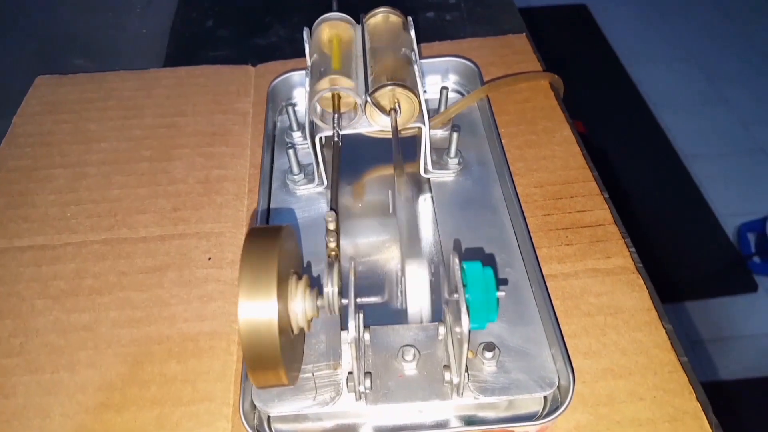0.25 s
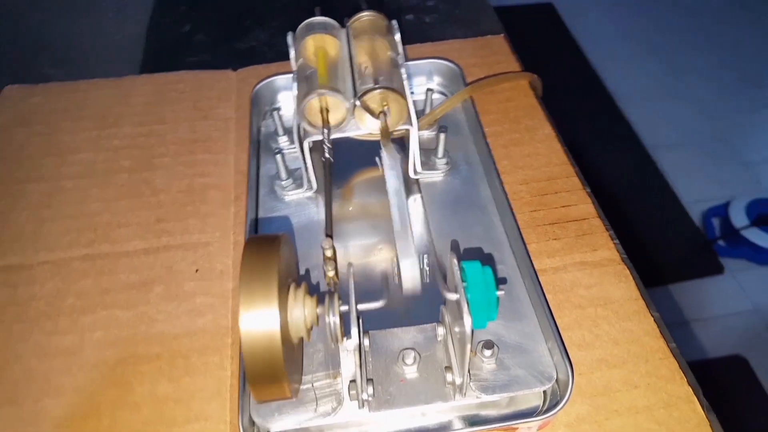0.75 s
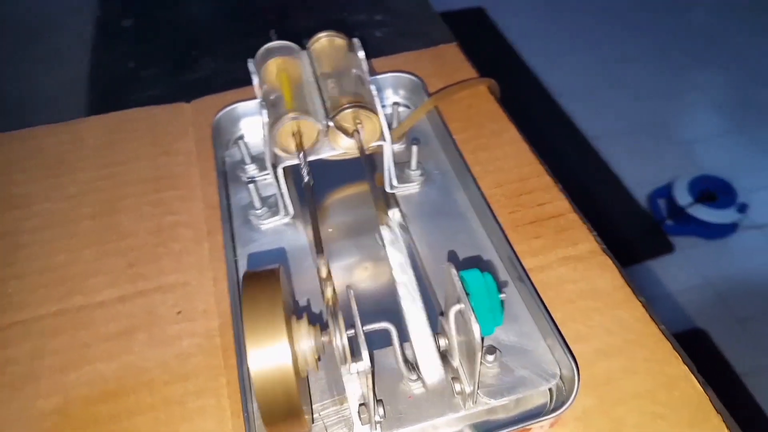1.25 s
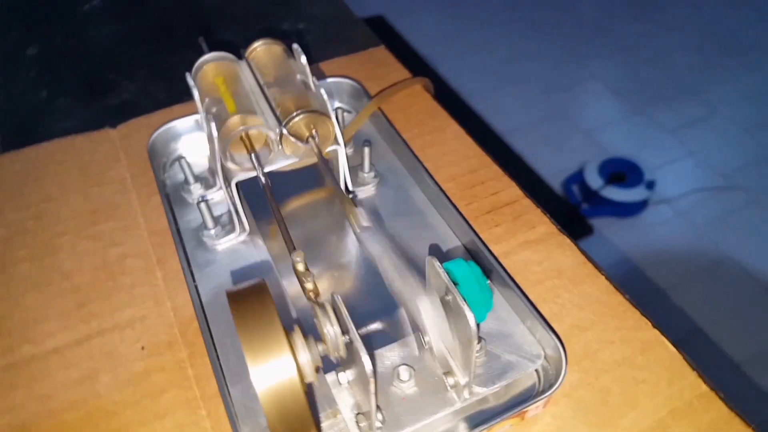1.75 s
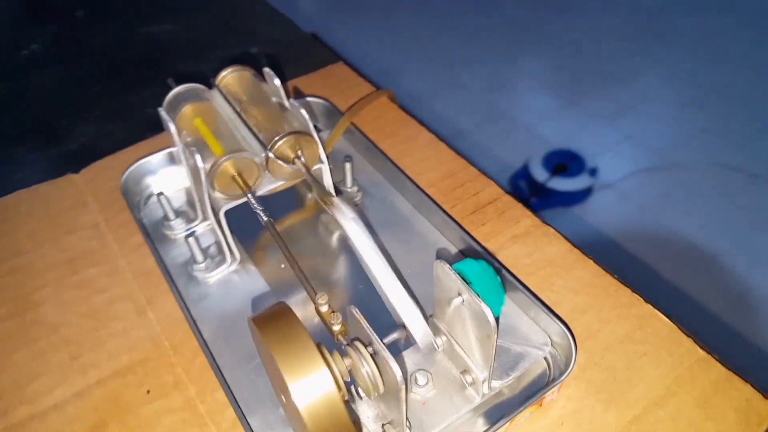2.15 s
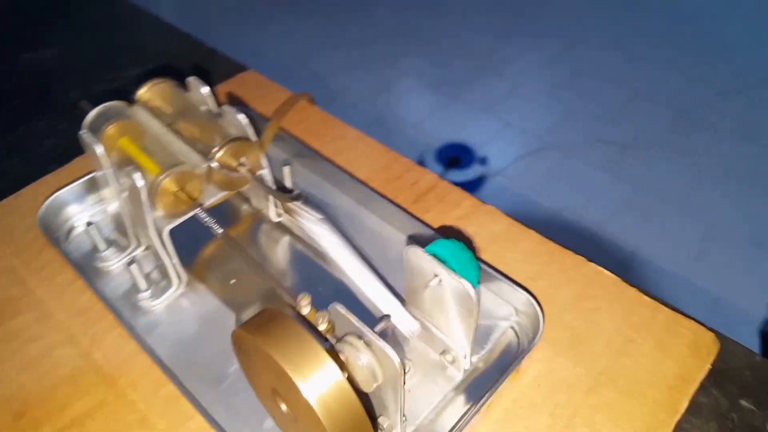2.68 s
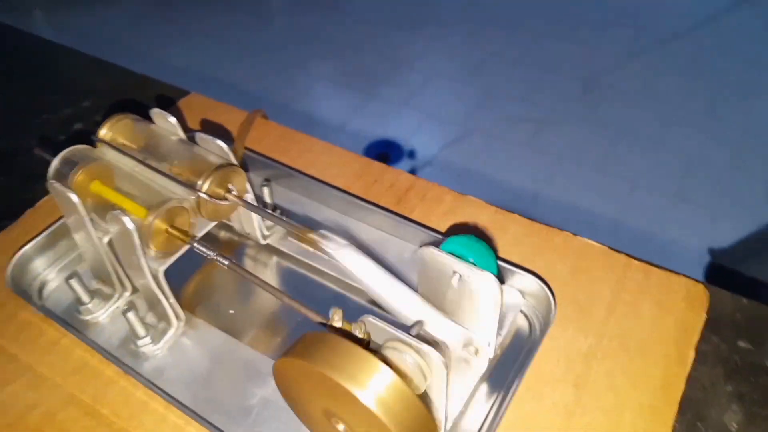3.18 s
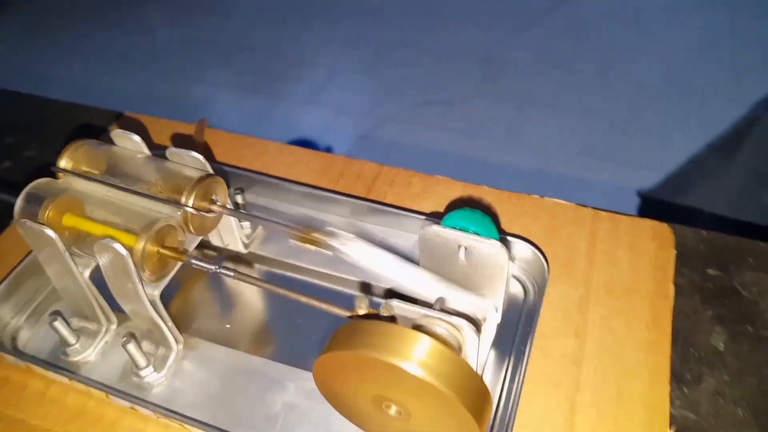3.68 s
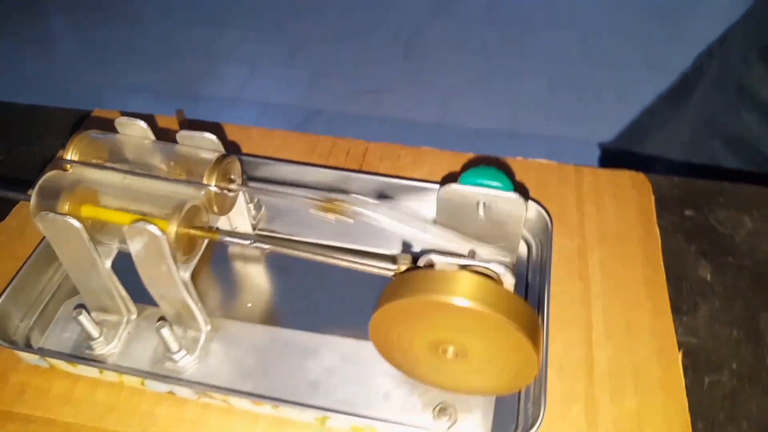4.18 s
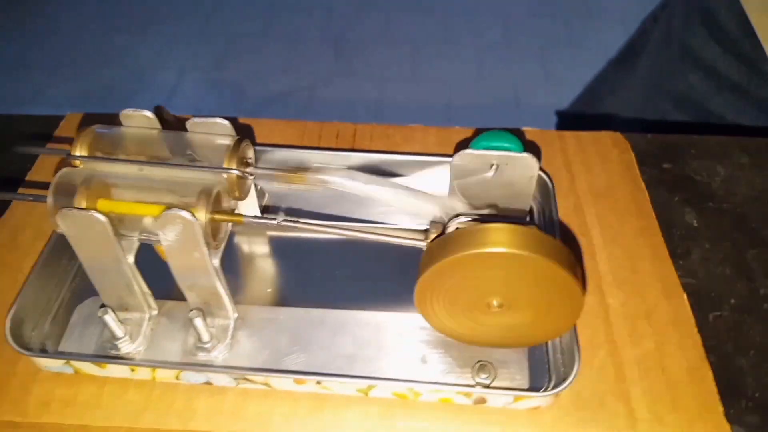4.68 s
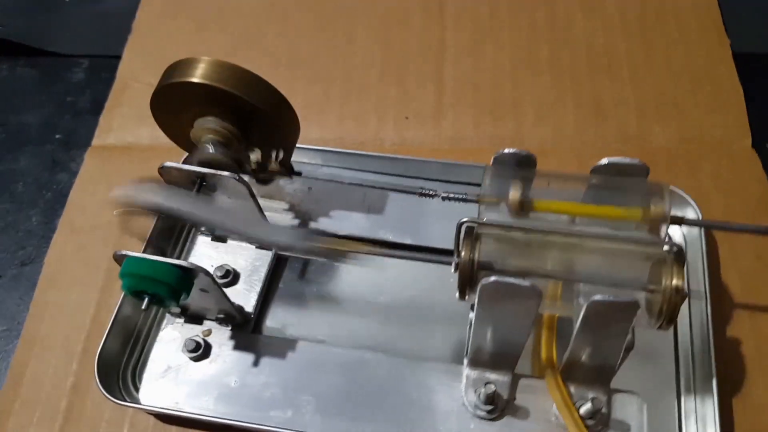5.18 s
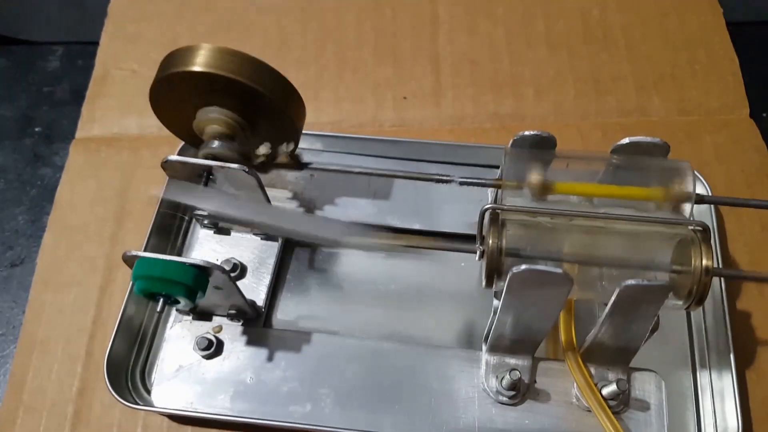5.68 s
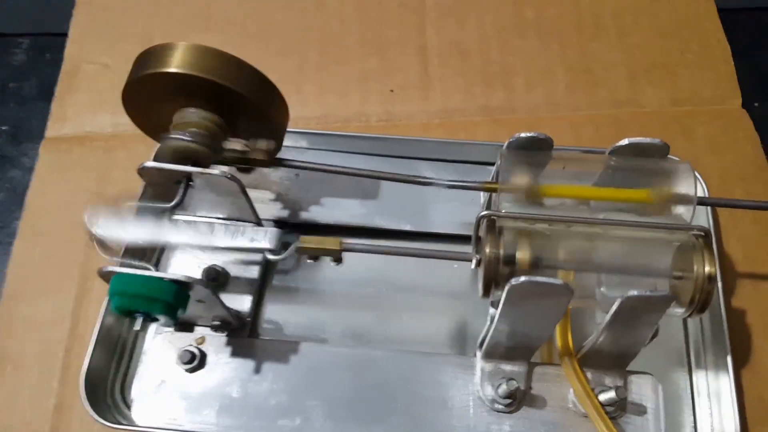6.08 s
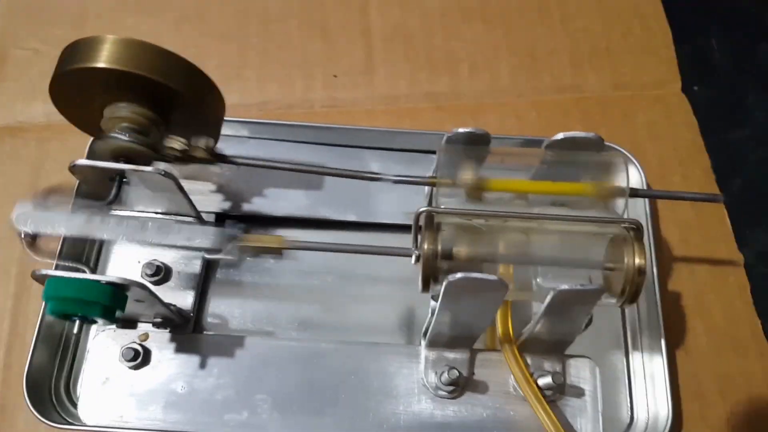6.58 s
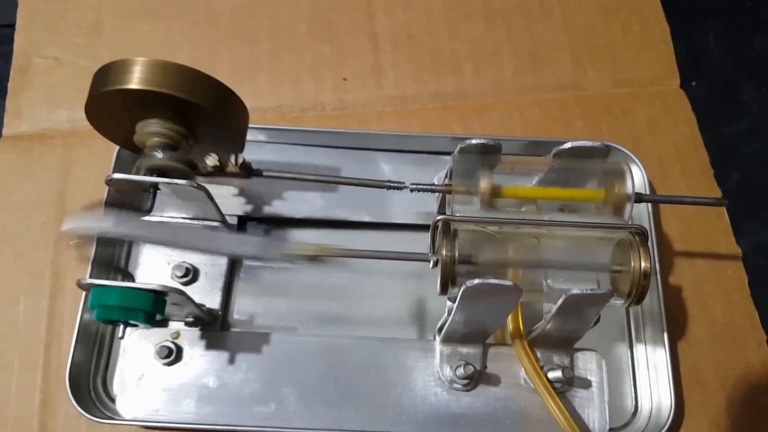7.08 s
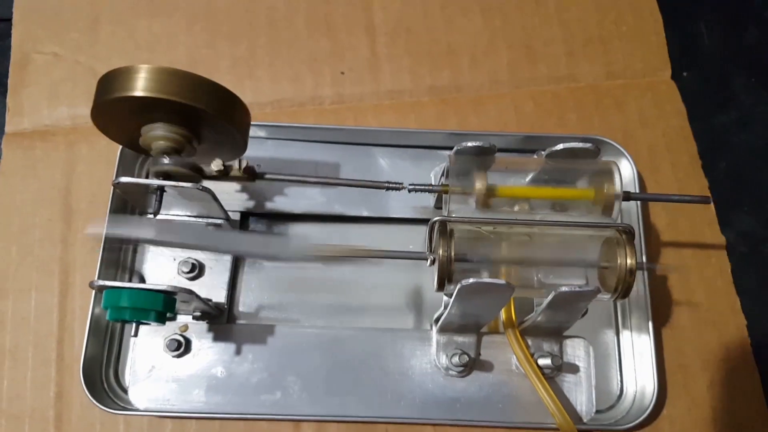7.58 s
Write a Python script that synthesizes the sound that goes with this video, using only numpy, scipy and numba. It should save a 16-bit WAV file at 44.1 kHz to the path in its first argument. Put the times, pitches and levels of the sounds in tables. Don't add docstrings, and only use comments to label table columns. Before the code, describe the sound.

Close handheld stereo sound of a model engine chuffing on compressed air, gradually accelerating. Airy puffs and thin whistling hiss sit over dull knocks from a metal tray. An early burst of hard clicks comes from a finger leaving the left microphone, then hand creaks and crackly rubbing on the right. A momentary silence cuts to a nearer, denser, quicker pulse that continues steadily to the end.

```python
import sys
import numpy as np
from scipy import signal
from scipy.fft import rfft, irfft, next_fast_len
from scipy.io import wavfile
from scipy.ndimage import uniform_filter1d, minimum_filter1d, map_coordinates
from numba import njit

SR = 44100
rng = np.random.default_rng(int(sys.argv[2]) if len(sys.argv) > 2 else 0)


def voltage_ratio(level):
    return 10 ** (np.asarray(level, float) / 20)


def wav_record(signal):
    frames = np.transpose(np.atleast_2d(signal))
    bounded = np.clip(frames, -1, 1)
    quanta = np.round(bounded * 32767).astype(np.int16)
    wavfile.write(sys.argv[1], SR, quanta)


N = 346185
TIME = np.arange(N) / SR
FAR_END_S, NEAR_START_S = 4.698, 4.7585
TOP_HZ = 15790
SLIDE_LEAD_TURNS = .045
RUB_TURNS, RUB_WIDTH_TURNS, RUB_DB = (0.28, 0.74), 0.076, 2.5
CHATTER_HZ, CHATTER_DB = 149, -2
STARVE_DB, STARVE_SLOPE = -22, .9
CANCEL_DB, CANCEL_SLOPE = -6.5, .22

BAND_EDGES = [2600, 3700, 4600, 5600, 7000, 8600, 10200, 11100, 12400, 14200]
# [pitch_hz, width_hz, level_db]
WHISTLE_FAR = [(11900, 150, 11.5), (8100, 730, 0), (13700, 250, -4)]
WHISTLE_NEAR = [(11453, 150, 11.8), (7070, 200, 7.2), (12500, 360, 2.5)]
# [pitch_hz, left_puff_db, left_out_db, left_back_db, right_puff_db, right_out_db, right_back_db]
STROKE_FAR = [(300, 6, 10, 12.5, 3.5, 2, 1.5), (1090, 7.5, 13.5, 14, -3.5, 4, 5),
              (2470, 4, 7.5, 8.5, -1, -2.5, -1), (4570, 4.5, 5, 5.5, 6.5, 7, 7.5),
              (5160, 3, 4, -0.5, 13.5, 11, 11.5), (6160, 12, 8, 6.5, 14.5, 14, 10.5),
              (7150, 2, -2.5, -1.5, 2.5, -2, -7), (8000, 2, -9, -11.5, 11, -0.5, 1.5),
              (9030, 2, -4.5, -5.5, 8, -3, -5), (10000, 13, -11, -15, 4.5, -5, -7.5),
              (10940, -2.5, -7, -4, 4.5, -4, -3.5), (12670, -7.5, -19, -12, -0.5, 0, 3.5),
              (12700, 2, -1, -5, 12, -15, 3.5), (13550, -5.5, -3, 6, 7.5, 3, 1.5),
              (14150, 5.5, 5.5, -3.5, 12.5, 16, 10), (15500, 5, 2, -2.5, 14, 2, 8)]
STROKE_NEAR = [(300, 6.5, 10, 9, 5.5, 6, 5), (1150, -2.5, 1.5, -1, -9, -1, 0),
               (2420, -8, -5.5, -5.5, -5, -7, -6), (4050, -7, -1.5, -1, -0.5, 1.5, 5),
               (5050, 2.5, 1.5, 0.5, 6.5, 7.5, 10), (5800, -4, -1, -6.5, 9.5, 5, 7),
               (7600, 4, -7.5, 3.5, 9.5, -3.5, 6), (7930, 2, -2.5, -13, 3, -11.5, -11),
               (9700, -1, -13, -8, 8, 1.5, 3), (10730, 8.5, 3, 2, 9.5, 7, 2),
               (11600, -15, -14, -12, 0.5, 2.5, 4.5), (13900, -4, -2, -0.5, 16, 3.5, 14.5),
               (15200, 6, -1, -8, 4, 8, 7.5)]
VALVE_FAR = (.455, .035)
VALVE_NEAR = (.46, .047)
# [place_turns, length_turns, thud_db, tick_db]
THUDS_FAR = [
    (.25, 0.1, -58.5, -50),
    (0.651, 0.26, -57.5, -55),
]
THUDS_NEAR = [
    (0.198, 0.68, -54.5, -30),
    (.57, 0.11, -59, -39),
]
# [place_turns, peak_db, pitch_hz, ring_cycles]
KNOCKS_FAR = [(.26, -45.5, 116, 5.6), (.45, -49, 113, 4)]
KNOCKS_NEAR = [(.15, -46, 120, 2.5), (.33, -43, 118, 2), (.555, -38, 106, 2.8), (.8, -45, 120, 2.5)]
# [pitch_hz, width_hz, level_db]
TRAY_MODES = [(68.6, 130, 4), (116, 48, 13), (190, 130, 4.5)]
# [time_s, lag_samples]
LAG = [(0, 0), (.7, 1), (.95, 2), (1.06, 5.5), (1.5, 5.2), (2.5, 6.8), (2.9, 9.5), (3.7, 12), (4.7, 11),
       (4.75, 0)]
# [pitch_hz, likeness_0_to_1]
LIKENESS = [(100, .78), (1500, .76), (2600, .6), (3700, .82), (4500, .6), (5400, .62), (6600, .72),
            (8200, .78), (9100, .82), (10000, .3), (12000, .42)]
# [pitch_hz, lead_half_turns]
TWIST_FAR = [(7000, 0), (7600, -.4), (9000, -.4), (9800, 0)]
TWIST_NEAR = [(300, 0), (2500, -.1), (3400, .35), (3800, .76), (4300, .76), (4700, .45), (4750, -.5),
              (5400, -.85), (5900, -.75), (6000, -1.4), (6400, -1.7), (7000, -1.8), (7600, -1.5),
              (9200, -1.5), (9600, -1.7)]
# [time_s, phase_half_turns]
ECHO_TURN = [(5.3, 0), (5.5, .36), (5.75, .42), (5.98, .36), (6.2, -.35), (7, -.35), (7.85, -.22)]
ECHO_BANDS = {4: .4, 5: .72, 6: 1.2}
# [pitch_hz, left_db, right_db]
SLIDE_FAR = [(198, -14.5, -8.5), (402, -9, -7.5), (640, -6, -8), (1540, -4, -3), (2180, 4.5, -5),
             (2790, 3, 13.5), (4980, 3.5, 13.5)]
SLIDE_NEAR = [(202, 2.1, 2.6), (390, 0.44, 0.41), (510, 0.91, 0.85), (544, 9.6, 8.2), (1180, 12.4, 10.8),
              (2090, 23, 17.8), (3130, 19, 14), (4570, 10.1, 7.5)]
# [pitch_hz, left_db, right_db]
PORT_FAR = [(4600, 4, 5), (6270, -1, 22.2), (7560, 5, 13.6), (8400, 2, 8.8), (9600, -4.5, 0.66),
            (10670, -26, 4.2), (11400, -24, 11.5), (11440, 34, 8.4), (11340, -2, 11.6), (12200, -1, 12),
            (12200, 17, 9.1), (13700, 5.5, 2.1), (16100, 10.5, 9)]
PORT_NEAR = [(4600, 10, 11), (6000, 12, 15.2), (7000, 14.5, 19.5), (8030, 26.5, 37.7), (9330, 0.5, 11),
             (10700, -8, 8.5), (11160, -3, 21), (11680, 12, 32.7), (12040, 9, 24), (12300, 9, 18),
             (12770, 12, 22.5), (14100, 9, 9.6), (15500, 20, 10.6)]
# [first_opening_s, start_turns_per_s, top_turns_per_s, time_constant_s]
CRANK_FAR = (-.1643, 3.0756, 7.4704, 16.273)
CRANK_NEAR = (4.654, 5.7015, 9.05, 60)
# [time_s, recorder_gain_db, right_port_facing_jet_0_to_1, left_port_covered_0_to_1]
POSE_FAR = [(0, 1, 0.41, 0.53), (0.66, 2, 0.39, 0.47), (0.902, 5, 0.33, 0.53), (1.048, -4.5, 0.5, 0.18),
            (1.3, -6, 0.4, 0.05), (1.551, -5.5, 0.5, 0.06), (1.66, 2.2, 0.49, 0.01),
            (1.95, 3.5, 0.66, 0.07), (2.62, 6, 0.65, 0.05), (2.68, 5.5, 0.25, 0.07), (3.1, 5, 0.11, 0.06),
            (3.6, 5, 0, 0.01), (4.1, 5.5, 0, 0.04), (4.7, 6.5, 0, 0.01)]
POSE_NEAR = [(4.75, -0.47, 0.47, 0), (5.8, 0.14, 0.33, 0), (7.85, -0.1, 0.1, 0)]
# [left_db, right_db, left_covered_db, left_facing_db, right_facing_db]
BANDS_FAR = [(-49, -52.5, 6.5, -2.1, 2.5), (-51, -57.5, -9, 4, 3), (-50, -50, -18, 4, -5),
             (-46, -45, -30, 8, -8.7), (-40.5, -58.5, -36, 4, 15), (-39, -53, -29.5, -1, 39),
             (-54.5, -57, 3.5, -12.5, 22), (-56, -49.5, 3, 5, 8.5), (-46.5, -41.5, -16, 3, -1.5),
             (-46.5, -49, -35, 2, 25), (-28.5, -58, -21, 4, 26)]
BANDS_NEAR = [(-41, -42, 0.0, 0.5, 1.4), (-40.5, -39.5, 0.0, -1.5, -4), (-42.5, -36.5, 0.0, 5.5, -4.5),
              (-38.5, -34, 0.0, 3, 1), (-36, -27.5, 0.0, 1, -1.8), (-32, -34, 0.0, -13, -19.5),
              (-40, -35, 0.0, 6.5, 6.5), (-44.5, -32, 0.0, 1, -0.5), (-43.5, -23, 0.0, 9.8, -5.5),
              (-39, -32.5, 0.0, -4, 6), (-30.5, -37, 0.0, 4, 25)]
# [start_s, peak_db, pitch_hz]
CREAKS = [(0.824, -35, 176), (0.921, -29, 218), (1.393, -43, 156), (1.558, -38, 227), (1.66, -42, 231),
          (1.679, -38, 237), (1.693, -38, 220), (1.708, -43, 200), (1.721, -29, 190), (1.728, -32, 547),
          (1.7315, -33, 620), (1.738, -49, 200), (1.799, -38, 600), (1.821, -32, 800), (1.879, -19, 1500),
          (2.005, -27.5, 707), (2.0295, -38, 854), (2.031, -20.5, 880), (2.212, -29.5, 273),
          (2.441, -29.5, 169), (2.766, -29.5, 270), (3.65, -35, 190), (4.318, -44, 166), (4.461, -23, 209),
          (4.468, -28, 246), (4.505, -39, 190), (4.557, -35, 298)]
# [deepest_swing_s, peak_db]
CHATTER = [(2.586, -39), (2.5967, -43), (2.619, -37.9), (2.6275, -42), (2.6385, -29), (2.6476, -33),
           (2.656, -51), (2.862, -47), (2.921, -42), (3.09, -43), (2.8914, -37), (2.9506, -36), (2.98, -35),
           (3.0012, -32), (3.014, -35), (3.0306, -35.5), (3.061, -37), (3.107, -34), (3.121, -31),
           (3.1346, -43), (3.1466, -39), (3.1607, -34.5), (3.1883, -33), (3.1993, -35.3), (3.2117, -36),
           (3.2386, -35), (3.253, -37), (3.27, -31), (3.286, -36), (3.3044, -46), (3.332, -35),
           (3.4172, -28), (3.449, -31), (3.4645, -31), (3.4787, -33), (3.492, -38.2), (3.501, -41),
           (3.511, -39.5), (3.559, -40.9)]
# [time_s, resonance_hz, resonance_db, rub_db]
FINGER = [
    (.9415, 900, -69, -55),
    (.944, 870, -45, -28),
    (.953, 1420, -12, -30),
    (0.962, 2500, -31, -33),
    (0.973, 3000, -18, -30),
    (.992, 4130, -33, -28),
    (1.04, 5200, -44, -42),
    (1.06, 5360, -46, -58),
    (1.26, 3800, -47, -62),
]
# [start_s, peak_db, pitch_hz, ring_cycles, rise_ms]
SNAPS = [(.9425, -13, 380, .9, .3), (.9745, -19, 4700, 5, .4), (.9524, -6, 1400, 2.2, .4),
         (.9560, 10.5, 2350, 4.5, .8), (.9571, 5, 1250, 2.3, .3), (.957, 0, 8500, 1, .05),
         (.9565, -1, 5200, 4, .3), (.9708, -9, 3100, 3, .2), (.9563, 3, 3200, 3, .4),
         (.9652, -14, 3000, 4, .4), (.973, -8, 2850, 9, .5), (.9765, -13, 3000, 7, .5),
         (.9915, -8, 1300, 1.5, .2), (.9917, -14, 4200, 4, .2), (1.006, -20, 1200, 1.5, .2)]
# [start_s, end_s, level_db]
SWAYS = [
    (-.2, 0.198, -63),
    (0.52, 0.79, -48),
    (0.894, 1.08, -47),
    (1.35, 1.45, -56),
    (2.437, 2.74, -58),
    (2.85, 3.6, -54),
    (4.4, 4.546, -70),
]


def unit(x):
    return x / np.sqrt(np.mean(x ** 2, axis=-1, keepdims=True))


def on_log(hz, points, values):
    return np.interp(np.log(hz + 1), np.log(points), values)


def walk(rate, count):
    k = int(SR / rate)
    held = np.repeat(rng.standard_normal(count // k + 1), k)
    return 0.99 * uniform_filter1d(uniform_filter1d(held, k), k)[:count]


def ring(hz, cycles, rise_ms=0.14):
    t = np.arange(int(6 * cycles / hz * SR)) / SR
    decay = np.exp(-t * hz / cycles * 2)
    rise = np.minimum(1000 * t / rise_ms, 1) ** 2
    return np.sin(2 * np.pi * hz * t + .6) * decay * rise


def add(track, s, sound):
    i = int(s * SR)
    track[i:i + len(sound)] += sound[:max(len(track) - i, 0)]


@njit
def sweep(x, hz, sharp):
    y, b, l = np.empty(len(x)), 0., 0.
    for i in range(len(x)):
        g = np.tan(np.pi * hz[i] / SR)
        v = (b + g * (x[i] - l)) / (1 + g * (g + 1 / sharp))
        b, l, y[i] = 2 * v - b, l + 2 * g * v, v / sharp
    return y


def pair(t, hz, grain):
    shared, *own = rng.standard_normal((3, len(t))) * grain
    source = np.arange(len(t)) - np.interp(t, *np.transpose(LAG))
    late = map_coordinates(shared, [source], order=3, mode="wrap")
    like = np.clip(on_log(hz, *np.transpose(LIKENESS)), 0, 1)
    return np.sqrt(like) * rfft([shared, late]) + np.sqrt(1 - like) * rfft(own)


def bump(turn, place, width, order=2):
    distance = (turn - place + .5) % 1 - .5
    return np.exp(-.5 * np.abs(distance / width) ** order)


def sway():
    low_band = signal.butter(2, [35, 130], "bandpass", fs=SR, output="sos")
    low = unit(signal.sosfilt(low_band, rng.standard_normal((2, N))))
    swell = 0
    for start, end, db in SWAYS:
        swell = swell + voltage_ratio(db) * np.sin(np.pi * np.clip((TIME - start) / (end - start), 0, 1))
    return low * swell * voltage_ratio([[-2.], [2.]])


def slips():
    pitch = CHATTER_HZ * (1 + 0.17 * np.tanh(rng.standard_normal(len(CHATTER))))
    runs = [(s - .6 / hz, db + CHATTER_DB, hz) for (s, db), hz in zip(CHATTER, pitch)]
    return list(CREAKS) + runs


def finger_rub(track):
    s, hz, cavity_db, rub_db = np.transpose(FINGER)
    inside = (TIME > s[0]) & (TIME < s[-1])
    t = TIME[inside]
    grit = rng.standard_normal((2, len(t))) * voltage_ratio(0.67 * walk(260, len(t)))
    pitch = np.interp(t, s, hz)
    cavity = unit(sweep(sweep(grit[0], pitch, 2.4), pitch, 2.4))
    rub_band = signal.butter(3, [150, 2000], "bandpass", fs=SR, output="sos")
    rub = unit(signal.sosfilt(rub_band, grit[1])) + voltage_ratio(-2.0) * grit[0]
    track[inside] = voltage_ratio(np.interp(t, s, cavity_db)) * cavity + voltage_ratio(np.interp(t, s, rub_db)) * rub


def hand():
    out = np.zeros((2, N))
    finger_rub(out[0])
    for s, db, hz, cycles, rise_ms in SNAPS:
        add(out[0], s, voltage_ratio(db) * ring(hz, cycles, rise_ms))
    for s, db, hz in slips():
        add(out[1], s, voltage_ratio(db + 8) * ring(1.1 * hz, 1.3, 420 / hz))
        add(out[1], s + .45 / hz, -voltage_ratio(db + 4) * ring(min(4 * hz, 2600), .9))
    return out


def tray(t, hz, turn, thuds, knocks):
    modes = np.sqrt(sum(voltage_ratio(db) ** 2 / (1 + ((hz - f) / w * 2) ** 4) for f, w, db in TRAY_MODES))
    rumble = unit(irfft(modes * pair(t, hz, 1), len(t)))
    out = voltage_ratio(-79.5) * rumble
    for place, width, thud_db, tick_db in thuds:
        out = out + voltage_ratio(thud_db + 1.7 * walk(3.74, len(t))) * bump(turn, place, width) * rumble
        hits = np.flatnonzero(np.diff(np.floor(turn - place - .05)))
        for i, (size, pitch, late) in zip(hits, rng.standard_normal((len(hits), 3))):
            tick = voltage_ratio(tick_db + 4.3 * size) * ring(2800 * (1 + .15 * np.tanh(pitch)), 1.5)
            start = i / SR + .003 * abs(late)
            add(out[0], start, tick)
            add(out[1], start, 0.47 * tick)
    for place, db, knock_hz, cycles in knocks:
        hits = np.flatnonzero(np.diff(np.floor(turn - place)))
        for i, (size, pitch) in zip(hits, rng.standard_normal((len(hits), 2))):
            knock = voltage_ratio(db + 1.5 * size) * ring(knock_hz * (1 + .06 * pitch), cycles, rise_ms=7.7)
            add(out[0], i / SR, knock)
            add(out[1], i / SR, 1.1 * knock)
    return out


def crank_turns(t, crank):
    first, rate, top, settle = crank
    run = np.maximum(t - first, 0)
    return top * run - (top - rate) * settle * (1 - np.exp(-run / settle))


def escaping_air(t, hz, turn, valve, stroke, twist):
    second, width = valve
    puff_sizes = voltage_ratio(rng.standard_normal(2 * int(turn[-1]) + 4))
    strength = puff_sizes[(2 * turn + .55).astype(int)]
    puff = np.minimum(1.1 * (bump(turn, 0, width) + bump(turn, second, width)), 1)
    outward = uniform_filter1d(1. * (turn % 1 < second), size=400)
    shares = puff * strength, (1 - puff) * outward, (1 - puff) * (1 - outward)
    phase = np.exp(1j * np.pi * np.outer([0, 1], on_log(hz, *np.transpose(twist))))
    stroke, air = np.transpose(stroke), 0
    for k, share in enumerate(shares):
        colour = voltage_ratio([on_log(hz, stroke[0], stroke[1 + k + 3 * c]) for c in range(2)]) * phase
        turbulence = voltage_ratio(1.0 * walk(300, len(t)))
        air = air + np.sqrt(share) * irfft(colour * pair(t, hz, turbulence), len(t))
    return air


def through_ports(air, hz, ports, whistles):
    ports = np.transpose(ports)
    colour = voltage_ratio([on_log(hz, ports[0], ports[1 + c]) for c in range(2)])
    whistle_db = sum(db / (1 + ((hz - f) / w * 2) ** 2) for f, w, db in whistles)
    heard = rfft(air) * colour * np.minimum(hz / 150, 1) ** 2
    return heard * voltage_ratio(np.outer([.6, 1], whistle_db))


def engine(t, crank, pose, bands, ports, whistles, twist, stroke, valve, thuds, knocks):
    n, hz = len(t), np.fft.rfftfreq(len(t), 1 / SR)
    turn = crank_turns(t, crank)
    air = through_ports(escaping_air(t, hz, turn, valve, stroke, twist), hz, ports, whistles)
    s, *controls = np.transpose(pose)
    gain_db, facing, covered = (np.interp(t, s, c) for c in controls)
    edges, out = np.log([1] + list(BAND_EDGES) + [SR]), 0
    for k, (left_db, right_db, cover_db, left_turn_db, right_turn_db) in enumerate(bands):
        up, down = (1 / (1 + np.exp((e - np.log(hz + 1)) / .035)) for e in edges[k:k + 2])
        left = left_db + cover_db * covered + left_turn_db * facing
        right = right_db + right_turn_db * facing
        db = np.array([left, right])
        is_slide = k < 3
        lead = np.exp(2j * np.pi * hz * SLIDE_LEAD_TURNS / crank[1] * is_slide)
        band = unit(irfft(air * (up - down) * lead, n))
        if is_slide:
            db = db + RUB_DB * sum(bump(turn, place, RUB_WIDTH_TURNS) for place in RUB_TURNS)
        if k in ECHO_BANDS:
            echo = np.exp(1j * np.pi * ECHO_BANDS[k] * np.interp(t, *np.transpose(ECHO_TURN)))
            band[1] = np.real(signal.hilbert(band[1]) * echo)
        out = out + band * voltage_ratio(db + gain_db + 1.1 * walk(16, n))
    return out + tray(t, hz, turn, thuds, knocks) * voltage_ratio(gain_db - np.mean(gain_db))


def scene():
    out = hand() + sway()
    split = next_fast_len(int(4.72 * SR))
    rest = next_fast_len(N - split)
    far = engine(TIME[:split], CRANK_FAR, POSE_FAR, BANDS_FAR, SLIDE_FAR + PORT_FAR[1:], WHISTLE_FAR,
                 TWIST_FAR, STROKE_FAR, VALVE_FAR, THUDS_FAR, KNOCKS_FAR)
    near = engine(TIME[-rest:], CRANK_NEAR, POSE_NEAR, BANDS_NEAR, SLIDE_NEAR + PORT_NEAR[1:], WHISTLE_NEAR,
                  TWIST_NEAR, STROKE_NEAR, VALVE_NEAR, THUDS_NEAR, KNOCKS_NEAR)
    out[:, :split] += far
    out *= TIME < NEAR_START_S
    out[:, -rest:] += near * (TIME[-rest:] >= NEAR_START_S)
    return out


def group_power(z):
    groups = np.abs(z[..., :768, :].reshape(*z.shape[:-2], 64, 12, -1)) ** 2
    return np.repeat(np.mean(groups, axis=-2), 12, axis=-2)


def starve(x):
    hz, _, z = signal.stft(x, SR, "cosine", nperseg=1536, noverlap=768)
    hz = hz[:768, None]
    each = group_power(z)
    around = uniform_filter1d(each.sum(axis=0), size=200, axis=0)
    z[:, :768] *= (each > voltage_ratio(2 * STARVE_DB) * around ** STARVE_SLOPE) | (hz < 7500)
    mid, side = (z[0] + z[1]) / 2, (z[0] - z[1]) / 2
    total = each.sum(axis=(0, 1))
    loud = total / np.median(total)
    enough = group_power(mid) > voltage_ratio(2 * CANCEL_DB) * loud ** CANCEL_SLOPE * group_power(side)
    mid[:768] *= enough | (np.abs(hz - 5800) > 3600)
    ports = np.array([mid + side, mid - side])
    return signal.istft(ports, SR, "cosine", nperseg=1536, noverlap=768)[1][:, :N]


def band_limit(x):
    return signal.sosfilt(signal.butter(12, 17080, fs=SR, output="sos"), x)


def record(dry):
    peak = np.abs(dry).max(axis=0)
    limit = np.minimum(1 / (peak + 1e-9), 1)
    gain = uniform_filter1d(minimum_filter1d(limit, size=200), size=100)
    size = next_fast_len(N)
    hz = np.fft.rfftfreq(size, 1 / SR)
    passed = np.clip((TOP_HZ - hz) / 60 + .5, 0, 1) / np.sqrt(1 + (45 / (hz + 1)) ** 4)
    x = irfft(rfft(dry * gain, size) * passed, size)[:, :N]
    fading = voltage_ratio(-np.clip(TIME - FAR_END_S, 0, 1) * 3200)
    since = TIME - NEAR_START_S
    opening = np.clip(since / .003, 0, 1) * voltage_ratio(np.interp(since, [0, .03], [-5, 0]))
    mix = np.clip(starve(x) * np.maximum(fading, opening), -1, 1)
    return band_limit(mix)


dry = scene()
out = record(dry)
wav_record(out)
```